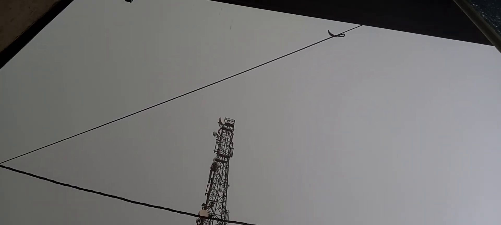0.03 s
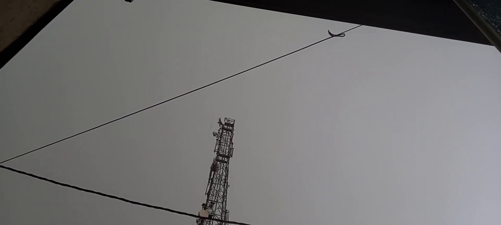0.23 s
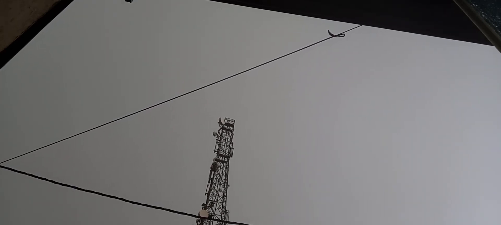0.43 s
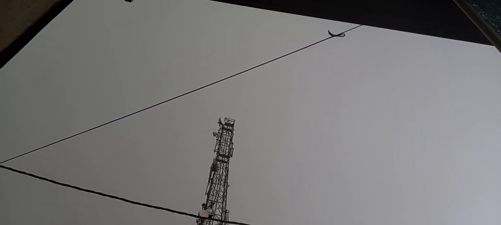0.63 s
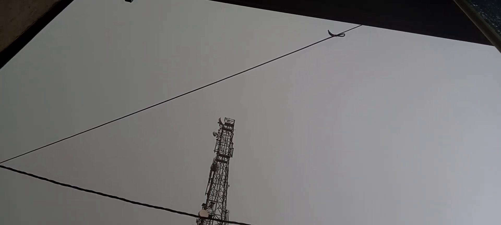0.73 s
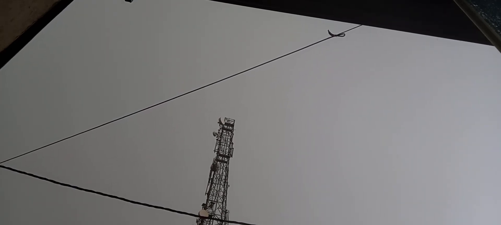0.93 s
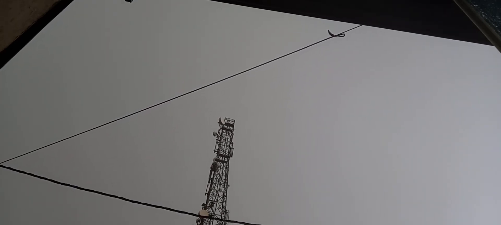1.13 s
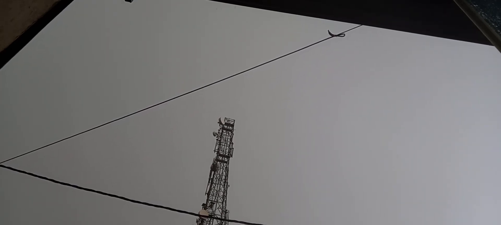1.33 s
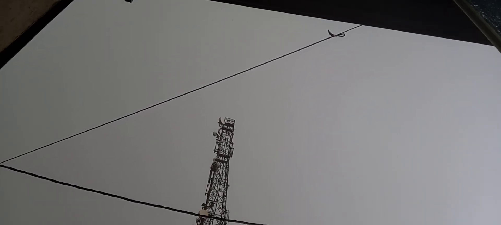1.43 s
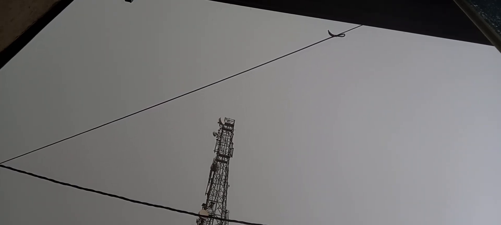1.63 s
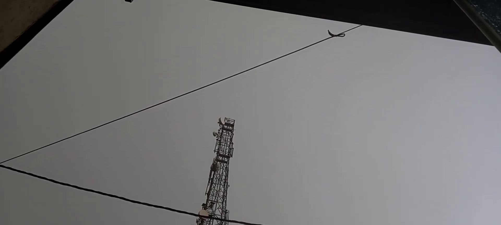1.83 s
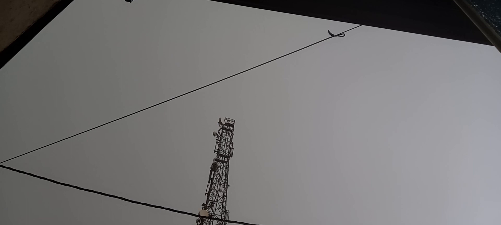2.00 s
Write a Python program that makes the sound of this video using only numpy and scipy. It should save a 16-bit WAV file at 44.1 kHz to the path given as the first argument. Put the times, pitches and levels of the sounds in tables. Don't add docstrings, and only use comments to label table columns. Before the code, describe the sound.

Low thunder pulses from the start, weakens midway, then surges into a powerful sustained boom. Rain hisses all around with small nearby splashes and pings, picked up by a small stereo microphone under an open-air cover.

```python
import sys
import numpy as np
from scipy import signal
from scipy.fft import rfft, irfft, next_fast_len
from scipy.io import wavfile
from scipy.ndimage import uniform_filter1d, map_coordinates

SR = 44100
rng = np.random.default_rng(int(sys.argv[2]) if len(sys.argv) > 2 else 0)


def to_wav(s):
    ch = np.atleast_2d(s).T
    pcm = np.round(np.clip(ch, -1, 1) * 32767)
    wavfile.write(sys.argv[1], SR, pcm.astype(np.int16))


def volts_from_decibels(level):
    exponent = np.asarray(level, float) / 20
    return 10 ** exponent


N = 90978

# (time [s], level [dB])
ROLL_LEVEL = [
    (0, -44),
    (.45, -43),
    (.75, -48),
    (1.07, -49),
    (1.35, -48),
    (1.6, -44),
    (1.75, -38),
    (2.06, -36),
]
# (time [s], peak [dB], ring [Hz], rise [s])
CLAP_PUSHES = [(0, -24.5, 85, 0.01), (0.031, -28.5, 84.5, 0.01), (0.067, -26.5, 83.6, 0.013),
               (.15, -31.5, 95, .012), (.182, -26.5, 75, 0.0091), (.235, -50, 96, .009),
               (0.291, -22.5, 82, 0.0093), (.345, -33, 85, 0.01), (0.383, -21.5, 78, 0.0063),
               (.412, -22.5, 84.7, 0.012), (0.487, -22, 81, 0.011), (.545, -23, 71, 0.0073),
               (.59, -24, 68, 0.0067), (.655, -27, 86.6, 0.01), (.69, -29, 102, 0.011),
               (.77, -35, 74, 0.013), (.819, -32.5, 89, 0.0089), (.855, -32, 80.8, 0.011),
               (.93, -36.5, 89.3, 0.0091), (.995, -36, 102.2, 0.02), (1.073, -28.5, 101, 0.011),
               (1.17, -52, 80, .014), (1.275, -32, 83.6, 0.012), (1.383, -25, 80.4, 0.019),
               (1.451, -26, 80.3, .018), (1.56, -27.5, 90, 0.016), (1.616, -30, 99, 0.0078)]
# (time [s], level [dB], ring [Hz])
PEAL_TRACK = [
    (1.655, -37.5, 80.2),
    (1.699, -18, 79),
    (1.733, -26, 92.4),
    (1.765, -20.5, 93.7),
    (1.8, -13, 86),
    (1.874, -14, 91.7),
    (1.951, -8.5, 92.3),
    (2.009, -18.5, 88.3),
    (2.033, -10.5, 91.74),
]
# (centre [Hz], width [Hz], level [dB])
BALCONY_MODES = [(49.5, 6, 1), (86, 34, 0), (160.8, 26.4, -15), (268.4, 100, -15), (433, 207, -27)]
# (centre [Hz], width [Hz], level [dB])
SIDE_MODES = [(54, 16, -13), (112, 22, -15)]
# (frequency [Hz], density [dB per Hz])
RAIN_SPECTRUM = [(60, 8), (150, 3.5), (400, 9), (1000, 2), (2000, 0), (4500, -6.5), (12000, -12),
                 (16000, -13)]
# (time [s], level [dB])
RAIN_LEVEL = [
    (0.0, -47),
    (1.34, -48.5),
    (1.66, -47),
    (1.97, -47.5),
    (2.06, -48.5),
]
# (time [s], peak [dB], left-right [dB], spread [s])
SPLASHES = [(.110, -38, 0, .002), (.212, -39, 0, .002), (.234, -39, 1, .002), (.264, -40, 3, .002),
            (.296, -31, 4, .0015), (.306, -36, 2, .001), (.5205, -35, 1.5, .004), (.582, -29, .5, .003),
            (.607, -37, -.5, .006), (.877, -39, 0, .002), (.965, -41, 0, .002), (1.079, -31, 2, .003),
            (1.548, -39, 1, .002), (1.743, -39, 0, .002), (1.752, -37, 0, .005), (1.776, -37, 0, .003),
            (1.799, -29, 0, .0015), (1.808, -38, 0, .002), (1.866, -40, 0, .001)]
# (time [s], peak [dB], left-right [dB], pitch [Hz])
PUDDLE_DROPS = [(.0513, -31, -1, 6100), (.056, -38, 0, 4200), (.1087, -33, 3, 6300), (.15, -37, 0, 6300),
                (.2359, -36, 1, 6500), (.2573, -30, 2, 6000), (.2954, -35, 3, 5900), (.3104, -41, 3, 1750),
                (.345, -39, 0, 2600), (.4673, -40, -2, 2400), (.5172, -35, 2, 6400), (.567, -37, 0, 1700),
                (.5796, -31, 0, 2150), (.585, -36, 0, 2300), (1.0994, -39, 0, 5800), (1.1513, -38, 0, 5500),
                (1.7988, -31, 0, 6400), (1.8287, -38, 0, 6200), (2.0428, -30, 0, 6200)]

PUSHES_PER_S, PUSH_SPREAD_DB = 150, 2.5
ROLL_DB, PEAL_ROUGH = -1.5, 0.15
CLAP_DB, CLAP_SAG, CLAP_EDGE_DB = -2, 0.25, -13
CRACK_S, CRACK_DB, CRACK_HZ, CRACK_FALL_S = 1.76, -22, 250, 0.014
GROWL_DB, GROWL_DB_PER_DB = -38, 0.46
SCATTER_DB, SCATTER_DB_PER_DB = -33.5, 0.25
DROPS_PER_S, DROP_SPREAD_DB, DROP_DB = 2300, 4, -5.5
END_ON_SHARE = 0.075
SPLASH_DECAY_S, SPLASH_DB = 0.003, -4.5
PING_S, PING_RISE, PING_HIGH_DB, PING_LOW_DB = 0.0007, 0.25, -6, -2
WET_S, WET_DB = 0.04, -10
PORTS_M, SOUND_M_S = 0.1638, 338
PORT_HZ, PORT_WIDTH_HZ, NOTCH_HZ, NOTCH_WIDTH_HZ = 6540, 790, 7340, 820
KNEE_DB, DUCK_DB_PER_DB, DUCK_S = -27, 0.3, 0.3
TOP_HZ = 15750


def unit(x):
    return x / np.sqrt(np.mean(x ** 2) + 1e-20)


def wobble(rate_hz):
    knots = rng.standard_normal(int(N * rate_hz / SR) + 4)
    return map_coordinates(knots, [np.arange(N) * rate_hz / SR])


def filtered(x, response):
    m = next_fast_len(N + SR // 2)
    return irfft(rfft(x, m) * response(np.fft.rfftfreq(m, 1 / SR)), m)[..., :N]


def ring(f, hz, width_hz):
    return 1j * f * width_hz / (hz * hz - f * f + 1j * f * width_hz)


def swell(u):
    return u * np.exp(1 - u)


def spikes(per_s, spread_db, channels):
    hit, sign, size = rng.random((3, channels, N))
    return unit((hit < per_s / SR) * np.sign(sign - 0.5) * volts_from_decibels(-spread_db * np.log(1.002 - size)))


def all_round(pair):
    def turn(f):
        return np.arccos(np.sinc(2 * f * PORTS_M / SOUND_M_S)) / 2
    mid, side = filtered(pair, lambda f: np.array([np.cos(turn(f)), np.sin(turn(f))]))
    return np.array([mid + side, mid - side])


def end_on(x):
    return np.array([x, filtered(x, lambda f: np.exp(-2j * np.pi * f * PORTS_M / SOUND_M_S))])


def pushes():
    return spikes(PUSHES_PER_S, PUSH_SPREAD_DB, channels=2)


def low_modes(f):
    (sub_hz, sub_width, sub_db), (hz, width, _) = BALCONY_MODES[:2]
    return ring(f, hz, width) * ring(f, hz, 3.85 * width) + volts_from_decibels(sub_db) * ring(f, sub_hz, sub_width) ** 2


def high_modes(f):
    return sum((-1) ** k * volts_from_decibels(db) * ring(f, hz, width) ** 2
               for k, (hz, width, db) in enumerate(BALCONY_MODES[2:]))


def claps():
    t = np.arange(N) / SR
    out = np.zeros(N)
    for at, peak_db, hz, rise_s in CLAP_PUSHES:
        u = np.maximum(t - at, 0) / rise_s
        turns = 2 * np.pi * hz * rise_s * (u + CLAP_SAG * (1 - np.exp(-u)))
        edge = volts_from_decibels(CLAP_EDGE_DB) * np.sin(turns * rng.uniform(1.88, 2.486)) * np.exp(-0.4 * u)
        out += volts_from_decibels(peak_db + CLAP_DB) * (np.sin(turns) + edge) * swell(u)
    return out


def peal_crack():
    u = np.maximum(np.arange(N) / SR - CRACK_S, 0) / CRACK_FALL_S
    hz = BALCONY_MODES[1][0]
    turns = 2 * np.pi * CRACK_FALL_S * (hz * u + (CRACK_HZ - hz) * (1 - np.exp(-u)))
    return volts_from_decibels(CRACK_DB) * np.sin(turns) * swell(u)


def peal(rough):
    t = np.arange(N) / SR
    s, db, ring_hz = np.transpose(PEAL_TRACK)
    level_db = np.interp(t, s, db) - 900 * np.maximum(s[0] - t, 0)
    hz = np.interp(t, s, ring_hz) * (1 + 0.04 * wobble(25))
    out = np.sqrt(2) * np.sin(2 * np.pi * np.cumsum(hz) / SR) + PEAL_ROUGH * rough
    beside = filtered(pushes(), lambda f: np.array([ring(f, c, width) ** 2 for c, width, _ in SIDE_MODES]))
    for x, (_, _, mode_db) in zip(beside, SIDE_MODES):
        out = out + volts_from_decibels(mode_db) * unit(x)
    return volts_from_decibels(level_db) * out


def thunder():
    roll_db = np.interp(np.arange(N) / SR, *np.transpose(ROLL_LEVEL))
    boom, rough = (unit(x) for x in filtered(pushes(), low_modes))
    near = volts_from_decibels(roll_db + ROLL_DB) * boom + claps() + peal_crack() + peal(rough)
    strength_db = 10 * np.log10(np.abs(uniform_filter1d(near ** 2, SR // 20)) + 1e-9) + 20
    growl_db = GROWL_DB + GROWL_DB_PER_DB * strength_db + 0.81 * wobble(36)
    growl = volts_from_decibels(growl_db) * unit(all_round(filtered(pushes(), high_modes)))
    stray = unit(filtered(pushes(), lambda f: low_modes(f) + 0.83 * high_modes(f)))
    stray = stray * volts_from_decibels(np.array([wobble(9.5), wobble(12.5)]))
    return near + growl + volts_from_decibels(SCATTER_DB + SCATTER_DB_PER_DB * strength_db) * stray


def rain():
    z = signal.stft(rng.standard_normal((3, N)), nperseg=512)[2]
    patches = uniform_filter1d(rng.standard_normal(z.shape[1:]), 8, 0)
    patches = unit(uniform_filter1d(patches, 8, 1))
    hiss = unit(signal.istft(z * volts_from_decibels(1.55 * patches), nperseg=512)[1][:, :N])
    hiss = hiss * volts_from_decibels(0.3 * wobble(3) + 0.8 * wobble(14) + 0.7 * wobble(40))
    crackle = filtered(spikes(DROPS_PER_S, DROP_SPREAD_DB, channels=3), lambda f: f / (f + 2500))
    drops = hiss + volts_from_decibels(DROP_DB + 3.5 * wobble(20)) * crackle
    knots_hz, db = np.transpose(RAIN_SPECTRUM)
    drops = filtered(drops, lambda f: volts_from_decibels(np.interp(np.log(f + 1), np.log(knots_hz), db)))
    field = np.sqrt(1 - END_ON_SHARE) * all_round(drops[:2]) + np.sqrt(END_ON_SHARE) * end_on(drops[2])
    level_db = np.interp(np.arange(N) / SR, *np.transpose(RAIN_LEVEL)) + 7
    return volts_from_decibels(level_db) * unit(field)


def near_drops():
    out = np.zeros((2, N + SR))
    t = np.arange(SR // 50) / SR
    pan = np.array([[0.5], [-0.5]])
    for s, db, pan_db, spread_s in SPLASHES:
        for late, gain_db in ((0, -4.5), (0.5, 10.5), (1, 5)):
            noise = rng.standard_normal((2, len(t))) * volts_from_decibels(-60 * t / SPLASH_DECAY_S)
            crack = np.diff(noise, prepend=0)
            start = round((s + late * spread_s) * SR)
            out[:, start:start + len(t)] += volts_from_decibels(db + gain_db + SPLASH_DB + pan_db * pan) * crack
    u = t / PING_S
    for s, db, pan_db, hz in PUDDLE_DROPS:
        turns = 2 * np.pi * hz * (t - PING_RISE * PING_S * (1 - np.exp(-u)))
        ping = np.sin(turns + rng.uniform(0, 2 * np.pi)) * swell(u)
        gain_db = PING_HIGH_DB if hz > PORT_HZ / 2 else PING_LOW_DB
        start = round(s * SR)
        out[:, start:start + len(t)] += volts_from_decibels(db + pan_db * pan + gain_db) * ping
    tail = rng.standard_normal((2, SR // 10)) * volts_from_decibels(-60 * np.arange(SR // 10) / SR / WET_S)
    wet = signal.fftconvolve(out, tail / np.linalg.norm(tail[0]), axes=1)
    return out[:, :N] + volts_from_decibels(WET_DB) * wet[:, :N]


def scene():
    return thunder() + rain() + near_drops()


def port(f):
    dip = NOTCH_HZ ** 2 - f * f + 1j * f * NOTCH_WIDTH_HZ
    peak = PORT_HZ ** 2 - f * f + 1j * f * PORT_WIDTH_HZ
    return dip / peak * (PORT_HZ / NOTCH_HZ) ** 2


def band_limit(x):
    return signal.sosfilt(signal.butter(12, 16490, fs=SR, output="sos"), x)


def record(dry):
    x = filtered(dry, lambda f: port(f) * (f < TOP_HZ))
    span = int(DUCK_S * SR)
    power = uniform_filter1d(np.mean(x ** 2, 0), span, origin=span // 2 - 1)
    level_db = 10 * np.log10(np.abs(power) + 1e-12)
    mix = x * volts_from_decibels(-DUCK_DB_PER_DB * np.maximum(level_db - KNEE_DB, 0))
    return band_limit(mix)


dry = scene()
out = record(dry)
to_wav(out)
```